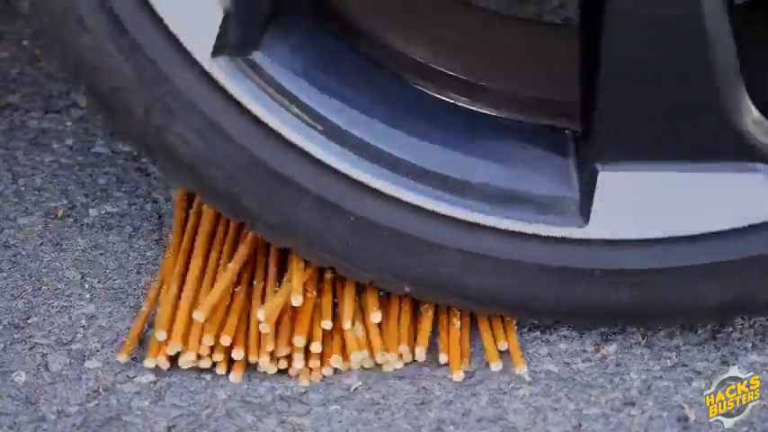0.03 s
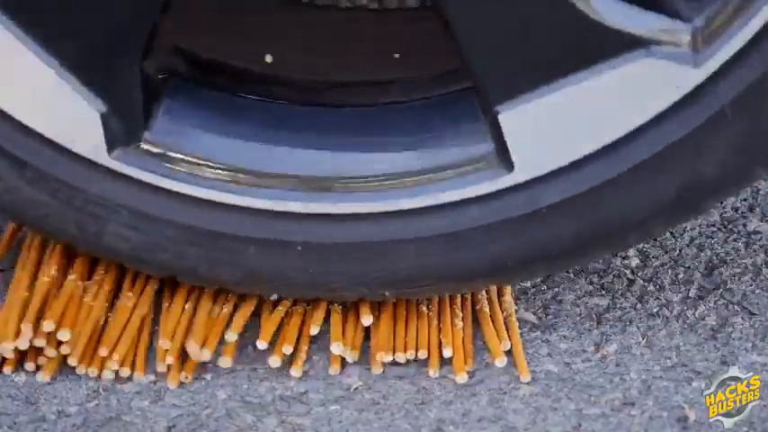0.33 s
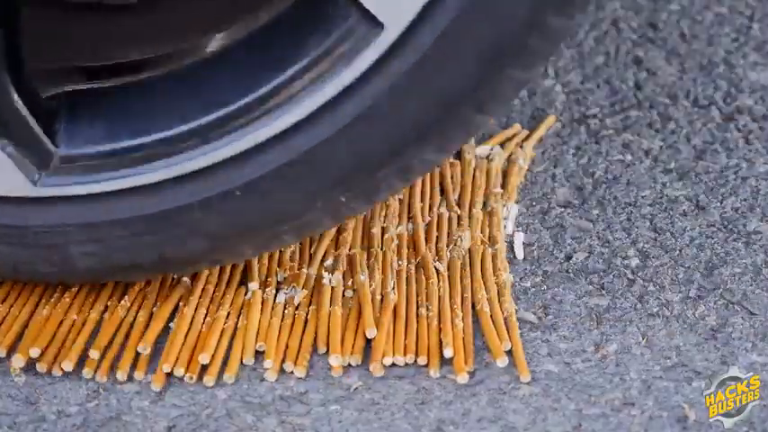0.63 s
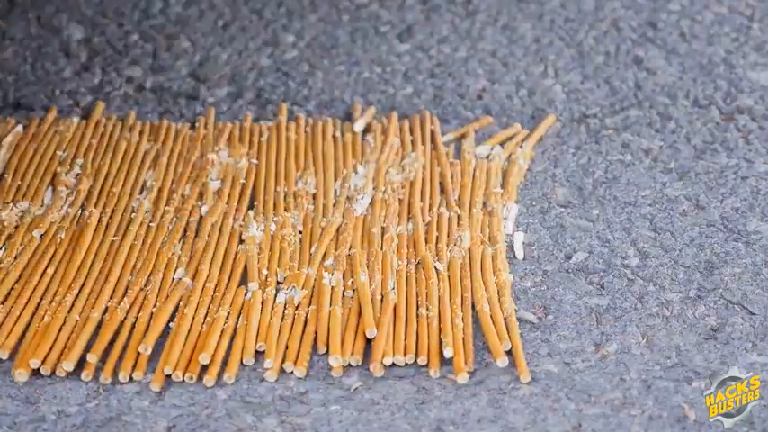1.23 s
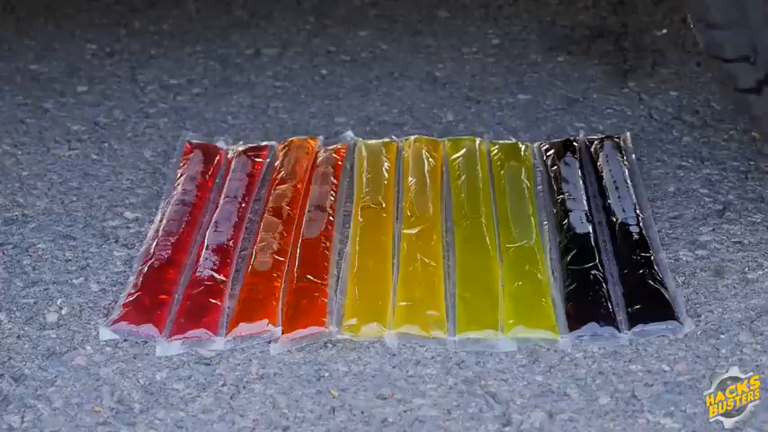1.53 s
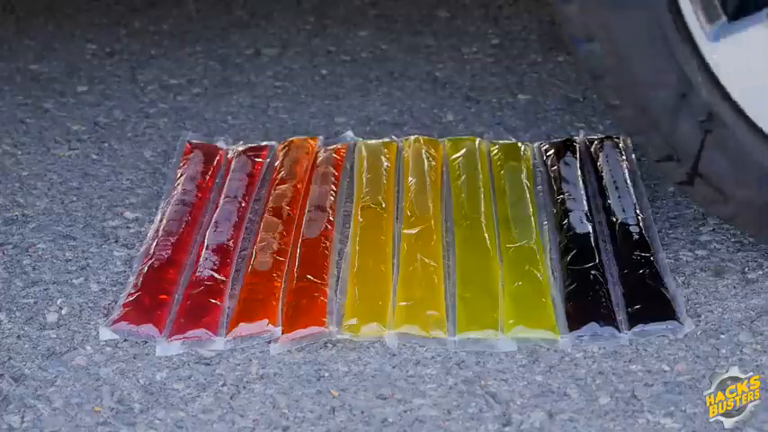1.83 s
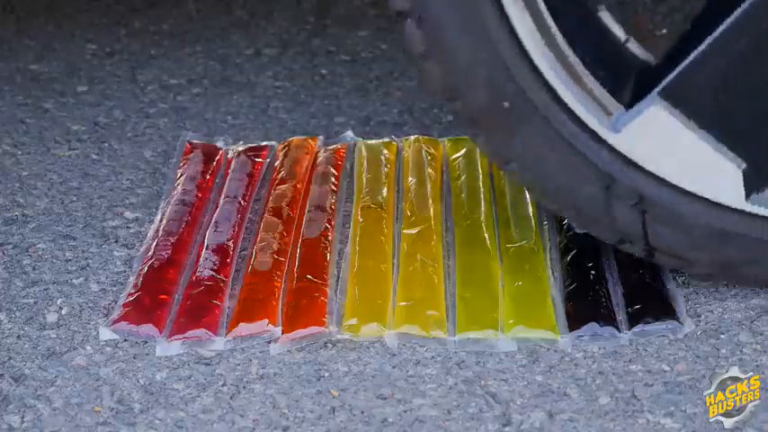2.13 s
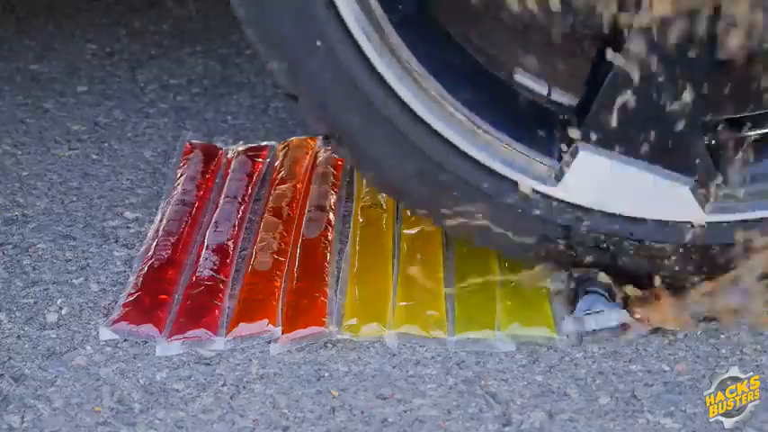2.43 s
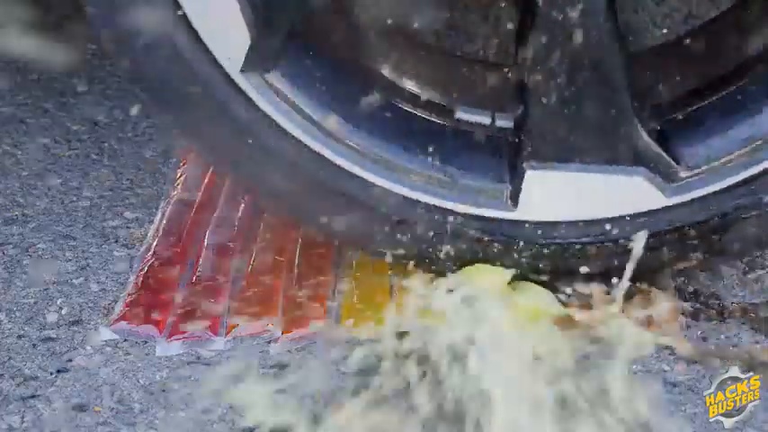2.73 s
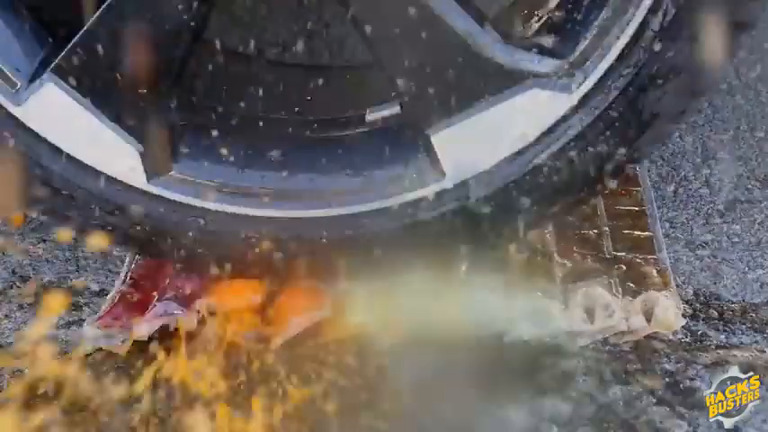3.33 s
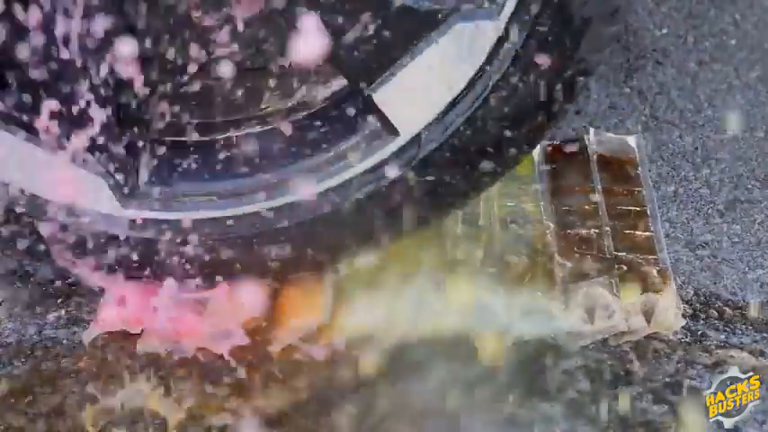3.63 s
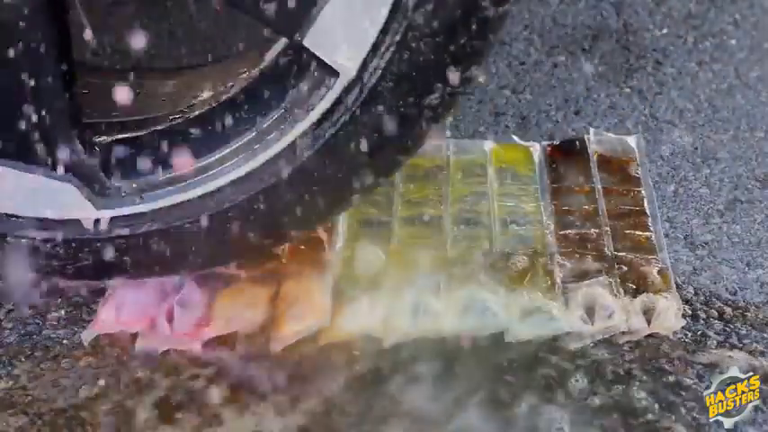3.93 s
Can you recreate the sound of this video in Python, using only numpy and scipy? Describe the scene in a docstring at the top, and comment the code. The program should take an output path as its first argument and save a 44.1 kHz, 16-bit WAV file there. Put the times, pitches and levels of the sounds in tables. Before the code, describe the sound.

A car tyre crushes things close by on asphalt. For the first second, brittle snack sticks crunch with dense cracks and snaps. Then only a quiet idling engine with a thin whine is heard. From about 2.3 seconds, liquid-filled plastic sachets crinkle and burst in about a dozen sharp pops, the loudest slightly distorted, with sprays of pattering drops. The pops weaken after 3.7 seconds, leaving a faint wet fizz.

```python
"""With the engine idling, a car tyre rolls over brittle snack sticks on asphalt, close to the microphone:
for the first second they fracture with knocks, cracks and splinters. The engine is then heard alone.
From 2.3 s the tyre squeezes a row of liquid-filled plastic sachets, which crinkle and burst one by one.
Each gives a sharp pop (the loud ones overload the microphone), a short scatter under the wheel arch
and a spray of drops that patter on the road."""
import sys
import numpy as np
from scipy import signal
from scipy.fft import rfft, irfft
from scipy.io import wavfile
from scipy.ndimage import uniform_filter1d

SR = 44100
rng = np.random.default_rng(int(sys.argv[2]) if len(sys.argv) > 2 else 0)


def bounce(signal):
    """Save signal as a 16-bit WAV file at the path given by the first command-line argument."""
    frames = np.transpose(np.atleast_2d(signal))
    limited = np.clip(frames, -1, 1)
    pcm = np.round(limited * 32767).astype(np.int16)
    wavfile.write(sys.argv[1], SR, pcm)


N = 176400
T = np.arange(N) / SR

# Bursting sachets (time [s], pop level [dB], first pitch [Hz], last pitch [Hz], ring decay [s],
# tear level [dB], scatter level [dB], scatter low cut [Hz], spray level [dB], spray decay [s])
BURSTS = [ (2.46, -8, 5200, 4200, 0.00063, 2.5, -16, 250, -22.5, 0.037),
          (2.4637, 5, 1560, 2150, 0.00093, -9, -19.5, 497, -28, .02),
          (2.578, 15, 1800, 578, 0.00083, -0.5, -20, 446, -29.5, 0.036),
          (2.7121, 12, 1300, 580, 0.00088, -8, -18.5, 300, -24.5, 0.018),
          (2.7955, 7, 4400, 2620, 0.00017, -12.5, -14, 200, -17.5, 0.023),
          (2.935, 3.5, 5500, 3970, 0.00059, -4, -14.5, 300, -18.5, 0.024),
          (3.0355, -2.5, 3300, 4000, 0.00081, -7.5, -22, 200, -24, 0.021),
          (3.0480, -4.5, 1500, 1920, 0.0013, -18, -18, 350, -17.5, 0.018),
          (3.207, 4, 1850, 1170, 0.00081, -8, -16, 254, -21.5, 0.029),
          (3.3486, 6.5, 1570, 970, 0.00043, -4, -14, 302, -32, 0.056),
          (3.5018, 14.5, 890, 2540, 0.00094, -10, -13.5, 604, -55, 0.026),
          (3.6380, 11.5, 1190, 3380, 0.0012, -2.5, -13, 1210, -42, 0.011),
          (3.9, -9.5, 1670, 2440, 0.0015, -40, -25, 550, -55, 0.019)]
SCATTER_S, SCATTER_SHAPE, SCATTER_GAP_S = 0.015, 1.57, 0.0025
FRACTURES_PER_S = 4500


def bursts():
    """Sudden pressure release: each sachet tears and rings briefly, and the pop scatters under the car."""
    out, t = np.zeros(N), T[:SR // 10]
    tear_hz, tear_s = 5000, 0.0015
    # Spectrum of the scattered sound (frequency [Hz], gain [dB])
    wash_colour = [(100, -42.5), (300, 0), (1400, 1.5), (2500, -3), (5000, -11.5), (16000, -70)]
    fade = np.exp(-(t / SCATTER_S) ** SCATTER_SHAPE)
    for start, pop_db, first_hz, last_hz, ring_s, tear_db, scatter_db, low_cut_hz, _, _ in BURSTS:
        tear = amp(tear_db) * hiss(tear_hz, 0.92, len(t)) * np.exp(-t / tear_s)
        pop = band(amp(pop_db) * ring(t, first_hz, last_hz, ring_s) + tear, 236, "high")
        lumps = amp(2.5 * walk(per_s=350)[:len(t)])
        noise = band(colour(rng.standard_normal(len(t)), wash_colour), low_cut_hz, "high")
        wash = unit(noise * lumps) * fade
        echo = unit(scatter(pop)) * np.sqrt(np.mean(fade ** 2))
        add(out, start, pop + amp(scatter_db) * (wash + 0.41 * echo))
    return out


def crunch():
    """Brittle fracture: sticks give way in small collapses, each a flurry of broadband impulses."""
    # Band envelopes before their trims (time [s], knock level [dB], crack level [dB], splinter level [dB])
    levels = [(0, -19.5, -28, -20.5), (0.07, -29.5, -26, -20.5), (0.17, -29.5, -27, -21),
              (0.21, -27, -27.5, -15.5), (0.26, -34.5, -26, -21), (0.45, -28, -27, -20.5),
              (0.6, -27, -26, -18.5), (0.70, -30.5, -28.5, -22), (0.74, -24, -24.5, -18.5),
              (0.78, -33.5, -25, -25), (0.86, -31.5, -27, -28), (0.9, -31.5, -25.5, -23.5),
              (0.955, -33, -23.5, -25), (1.03, -40, -32, -32), (1.11, -67, -46, -47)]
    # Spectrum of the fractures (frequency [Hz], gain [dB])
    fracture_colour = [(100, -30), (222, -24.5), (250, -3.5), (380, -6.5), (520, -2.5), (680, -4),
                       (860, -2.5), (1000, -7), (1170, -3), (1600, -6), (2500, -9), (3700, -16.5),
                       (7500, -14), (10000, -13), (11700, -10), (16000, -19)]
    collapse_s, release_s, grind_share = .0028, 0.026, .95
    knock_edge_hz, splinter_edge_hz = 684, 4430
    onsets = np.abs(clicks(per_s=190, spread_db=1.25))
    collapses = signal.lfilter([1], [1, -np.exp(-1 / (collapse_s * SR))], onsets)
    fractures = clicks(FRACTURES_PER_S, spread_db=2.5) * (grind_share + unit(collapses))
    crackle = colour(fractures + amp(-4.5) * scatter_spread(fractures), fracture_colour)
    knocks = band(crackle, knock_edge_hz, "low", order=4)
    cracks = band(crackle, [knock_edge_hz, splinter_edge_hz], "band", order=4)
    splinters = band(crackle, splinter_edge_hz, "high", order=4)
    out = 0
    for column, (trim_db, part) in enumerate([(1, knocks), (0.5, cracks), (-3, splinters)], start=1):
        steady = part / np.sqrt(uniform_filter1d(part ** 2, SR // 20) + 1e-12)  # unit rms over 50 ms
        out = out + amp(trim_db) * steady * curve(levels, column)
    return out * np.exp(-np.maximum(T - levels[-1][0], 0) / release_s)


def snaps():
    """Release of elastic strain: single sticks break with a bright crack, bundles with a woody knock."""
    # Single sticks snapping (time [s], level [dB])
    sticks = [(0.0685, -6), (0.1826, -4), (0.2024, -4), (0.2078, -6), (0.218, -3), (0.2438, -8),
              (0.2533, -1), (0.273, -4), (0.2843, -4), (0.3228, -2.5), (0.3408, 0), (0.3595, -8),
              (0.3757, -2), (0.455, -1), (0.495, -0.5), (0.5526, -3), (0.6488, -6.5), (0.7958, -4)]
    # Bundles giving way against the road (time [s], level [dB], last pitch [Hz])
    bundles = [(0.0551, -9, 630), (0.137, -11, 970), (0.207, -10, 830), (0.3378, -11, 890),
               (0.3769, -9.5, 840), (0.392, -13, 850), (0.4403, -9, 630), (0.4895, -13, 950),
               (0.5341, -13, 980), (0.6121, -13.5, 750), (0.7969, -14, 840), (0.808, -10, 800),
               (0.8239, -15, 835), (0.8693, -9, 880), (0.9124, -10, 825)]
    snap_hz, snap_s = 11000, .0006
    cracks, knocks, t = np.zeros(N), np.zeros(N), T[:SR // 20]
    for start, db in sticks:
        hz = snap_hz * np.exp(.12 * rng.random())
        add(cracks, start, amp(db) * hiss(hz, 0.16, len(t)) * np.exp(-t / snap_s))
    for start, db, hz in bundles:
        knock = ring(t, first_hz=1.55 * hz, last_hz=hz, decay_s=0.002)
        add(knocks, start, amp(db) * band(knock, 280, "high", order=4))
    return cracks + knocks + scatter(amp(-17) * cracks + amp(-9) * knocks)


def spray():
    """Incoherent sources add in power: drops patter after each burst; wet film fizzes under the tread."""
    # Spectrum of drops on the road (frequency [Hz], gain [dB])
    spray_colour = [(100, -19), (270, 7), (450, -2.5), (800, 4.5), (1800, 4.5), (3000, -1), (5500, -1),
                    (8500, -8), (12000, -7), (16000, -24)]
    # Spectrum of the wet film (frequency [Hz], gain [dB])
    fizz_colour = [(150, -11), (600, -3), (1800, -0.5), (6000, -2.5), (9000, -6), (12000, -7.5),
                   (16000, -20)]
    # Fizz of the squeezed film (time [s], level [dB])
    squeeze = [(2.29, -54), (2.325, -41.5), (2.378, -26.5), (2.395, -47), (2.69, -55), (2.78, -38),
               (2.87, -31), (3.0, -38.5), (3.13, -33.5), (3.18, -36.5), (3.3, -36), (3.48, -32), (3.6, -41),
               (3.74, -42.5), (3.87, -40.5), (3.97, -35), (4.0, -44)]
    rise_s = 0.0068
    power = 0
    for start, *_, spray_db, decay_s in BURSTS:
        age = np.maximum(T - start, 0)
        shower = amp(spray_db) * (1 - np.exp(-age / rise_s)) * np.exp(-age / decay_s)
        power = power + 2 * shower ** 2
    patter = np.sqrt(power) * droplets(spray_colour)
    fizz = curve(squeeze) * (T > squeeze[0][0]) * droplets(fizz_colour)
    return patter + fizz


def droplets(spectrum):
    """Shot noise: tiny random impacts and their reflections merge into an uneven patter."""
    drops = clicks(per_s=13000, spread_db=4.5) * amp(2.2 * walk(per_s=130))
    return unit(colour(drops + .5 * scatter_spread(drops), spectrum))


def film():
    """Damped transients: as the sachets flatten, film crinkles and liquid gulps with trapped air."""
    # Crinkles and squirts (time [s], level [dB], centre frequency [Hz], decay [s])
    crinkles = [(2.541, -21.5, 5000, .0015), (2.5939, -18.5, 1700, 0.0057), (2.815, -19, 1700, 0.0025),
                (2.96, -15.5, 2000, 0.0028), (3.0683, -9, 12000, 0.0029), (3.126, -26, 9500, 0.0088),
                (3.177, -28, 4000, .002), (3.2091, -5, 2970, 0.0016), (3.3704, -13, 9150, 0.0022),
                (3.371, -15, 1350, 0.0023), (3.415, -12, 4020, 0.00047), (3.469, -14, 6000, 0.0015),
                (3.56, -19.5, 2360, 0.0049), (3.620, -20.5, 3660, 0.0038), (3.634, -9, 1400, .003),
                (3.759, -28.5, 3800, 0.0064), (3.789, -21.5, 4450, 0.00095), (3.8986, -20.5, 1370, 0.0045)]
    # Gulps, rising slightly in pitch (time [s], level [dB], first pitch [Hz], decay [s])
    gulps = [(2.343, -26.5, 750, 0.013), (2.4611, -4.5, 308, 0.0032), (2.648, -20.5, 416, 0.0029),
             (2.776, -21.5, 625, .003), (2.791, -14, 550, 0.0027), (3.034, -16, 336, 0.004),
             (3.101, -22, 510, 0.0075), (3.113, -18, 292, 0.011), (3.151, -21, 700, 0.0035),
             (3.472, -18.5, 187, 0.003)]
    out, t = np.zeros(N), T[:SR // 10]
    for start, db, hz, decay_s in crinkles:
        add(out, start, amp(db) * hiss(hz, 0.55, len(t)) * np.exp(-t / decay_s))
    attack = 1 - np.exp(-t / 0.0013)
    for start, db, hz, decay_s in gulps:
        roughness = .85 * hiss(hz, 0.29, len(t)) * np.exp(-t / decay_s)
        gulp = (ring(t, hz, hz * 1.09, decay_s) + roughness) * attack
        add(out, start, amp(db) * band(gulp, hz / 2, "high"))
    return out + amp(-15.5) * scatter(out)


def hollow():
    """Cavity resonance: fractures ring the gap under the tread, narrowly at first, later broadly."""
    # Resonances (time [s], half length [s], centre frequency [Hz], half width [octaves], level [dB])
    resonances = [(0.48, 0.2, 1172, 0.041, -27.5), (0.917, 0.058, 1000, 0.18, -24.5)]
    out = 0
    for at_s, span_s, hz, octaves, db in resonances:
        fractures = clicks(FRACTURES_PER_S, spread_db=2.5)
        rung = band(fractures, [hz / 2 ** octaves, hz * 2 ** octaves], "band", order=1)
        swell = np.exp(-((T - at_s) / span_s) ** 2)
        out = out + amp(db) * unit(band(rung, hz / 2, "high")) * swell
    return out


def idle():
    """Masking: the idling car is a rush with a thin whine, which sinks into it as the sachets are neared."""
    # Rush beside the sticks (frequency [Hz], gain [dB])
    sticks_colour = [(30, -24), (90, -12), (165, -6), (230, -12.5), (470, -8), (1400, -14), (2300, -13.5),
                     (5000, -21), (8500, -31.5), (12000, -29.5), (16000, -39)]
    # Rush beside the sachets (frequency [Hz], gain [dB])
    sachets_colour = [(30, -26), (81, -11.5), (260, -10), (437, -2.5), (801, -7.5), (962, -9.5),
                      (2120, -8.5), (3140, -12.5), (5300, -18.5), (6400, -19), (8800, -28.5), (9900, -27.5),
                      (12000, -25), (16000, -37)]
    # Whine as the sachet pass begins (frequency [Hz], level against the rush [dB])
    partials = [(1602, -19), (2001, -18), (2401, -10), (2799, -19), (2910, -17.5)]
    # The car during the sachet pass (time [s], level [dB])
    levels = [(1.42, -39), (1.8, -39), (2.25, -39), (3.0, -42.5), (3.7, -68), (4.0, -52)]
    sachet_pass_s, fade_db_per_s = 1.405, 3
    by_sticks = unit(colour(rng.standard_normal(N), sticks_colour)) + whine(hz=1988, db=-10)
    fade = amp(-fade_db_per_s * np.maximum(T - sachet_pass_s, 0))
    tones = sum(whine(hz, db) for hz, db in partials) * fade
    by_sachets = unit(colour(rng.standard_normal(N), sachets_colour)) + tones
    flutter = amp(.8 * walk(per_s=23.72))
    return np.where(T < sachet_pass_s, amp(-41) * by_sticks, by_sachets * curve(levels)) * flutter


def whine(hz, db):
    """Random amplitude and frequency modulation make a thin tone waver."""
    gain = amp(db + 2 * walk(per_s=14.3))
    pitch = hz * (1 + .0012 * walk(per_s=29.2))
    return gain * np.sqrt(2) * np.sin(2 * np.pi * np.cumsum(pitch) / SR)


def scatter(x):
    """Diffuse reflection between road, tyre and wheel arch: convolution with a short unit-energy echo."""
    t = T[:SR // 10]
    echo = rng.standard_normal(len(t)) * np.exp(-(t / SCATTER_S) ** SCATTER_SHAPE) * (t > SCATTER_GAP_S)
    return signal.fftconvolve(x, echo / np.linalg.norm(echo))[:len(x)]


def scatter_spread(x, count=3):
    """Distributed source: clicks come from several places, each with its own reflections."""
    place = rng.integers(count, size=N)
    return sum(scatter(x * (place == k)) for k in range(count))


def ring(t, first_hz, last_hz, decay_s, glide_s=0.000596):
    """Damped oscillation whose pitch glides quickly to its last value."""
    hz = last_hz + (first_hz - last_hz) * np.exp(-t / glide_s)
    return -np.sin(2 * np.pi * np.cumsum(hz) / SR) * np.exp(-t / decay_s)


def clicks(per_s, spread_db):
    """Poisson impulses of either sign, a few much larger than the rest."""
    hits = rng.random(N) < per_s / SR
    sizes = amp(spread_db * np.minimum(rng.exponential(size=N), 5))
    return hits * sizes * rng.choice([-1, 1], N)


def hiss(hz, octaves, size):
    """Band-limited noise at unit rms, reaching the given octaves to each side of hz."""
    edges = [hz / 2 ** octaves, hz * 2 ** octaves]
    return unit(band(rng.standard_normal(size), edges, "band", order=1))


def walk(per_s):
    """Slow random drift at unit rms: a moving average of random steps."""
    hold = int(SR / per_s)
    steps = np.repeat(rng.standard_normal(N // hold + 1), hold)
    return unit(uniform_filter1d(steps, hold)[:N])


def colour(x, points, size=4096):
    """Minimum-phase filter through points of (frequency [Hz], gain [dB])."""
    hz, db = np.array(points).T
    f = np.maximum(np.fft.rfftfreq(size, 1 / SR), 1)
    gain = amp(np.interp(np.log(f), np.log(hz), db))
    cepstrum = irfft(np.log(gain))
    cepstrum[1:size // 2] *= 2  # folding onto positive time makes the filter causal
    cepstrum[size // 2 + 1:] = 0
    return signal.fftconvolve(x, irfft(np.exp(rfft(cepstrum))))[:len(x)]


def band(x, hz, kind, order=2):
    """Butterworth filter: a maximally flat passband."""
    sections = signal.butter(order, np.minimum(hz, SR / 2 - 1000), kind, fs=SR, output="sos")
    return signal.sosfilt(sections, x)


def curve(rows, column=1):
    """Amplitude envelope interpolated from one dB column of a time table."""
    rows = np.array(rows)
    return amp(np.interp(T, rows[:, 0], rows[:, column]))


def amp(db):
    """Decibels to amplitude ratio."""
    return 10 ** (np.asarray(db) / 20)


def unit(x):
    """Normalisation to rms 1."""
    return x / np.sqrt(np.mean(x ** 2) + 1e-20)


def add(out, start, x):
    """Superpose x on out from start [s]."""
    i = max(int(start * SR), 0)
    out[i:i + len(x)] += x[:max(N - i, 0)]


def scene():
    """Linear superposition: sticks first, then sachets, over the idling car."""
    return (crunch() + hollow() + snaps() + bursts() + spray() + film() + idle())[None]


def record(dry):
    """Overload clips the loud pops flat; a steep low-pass cuts the top above 15.8 kHz."""
    low_pass = signal.ellip(8, .05, 50, 15800, fs=SR, output="sos")
    return signal.sosfiltfilt(low_pass, np.clip(dry, -1, 1))


dry = scene()
out = record(dry)
bounce(out)
```